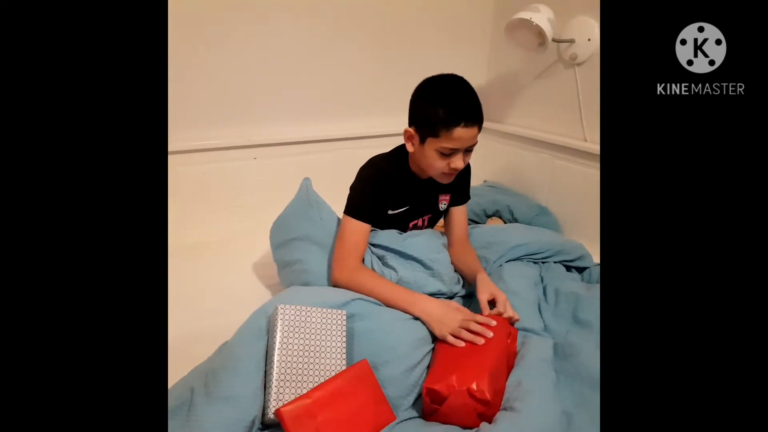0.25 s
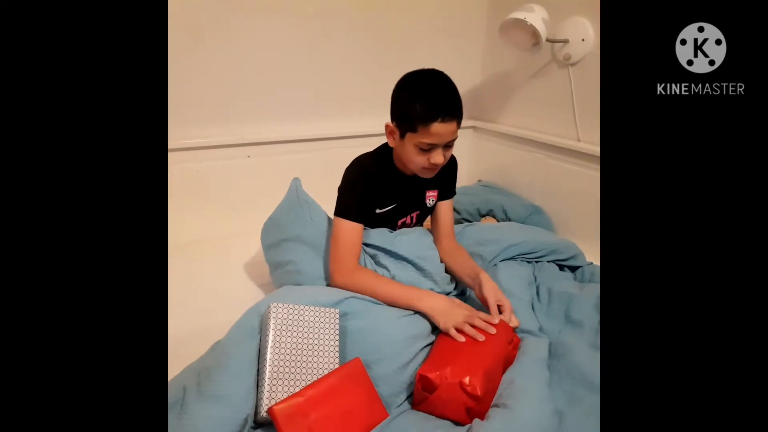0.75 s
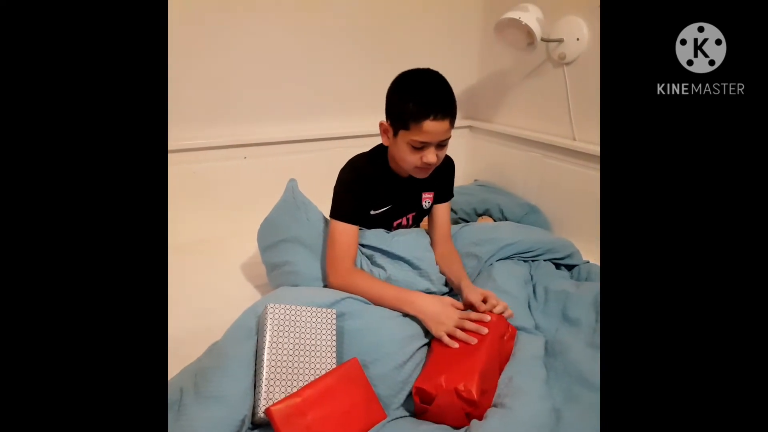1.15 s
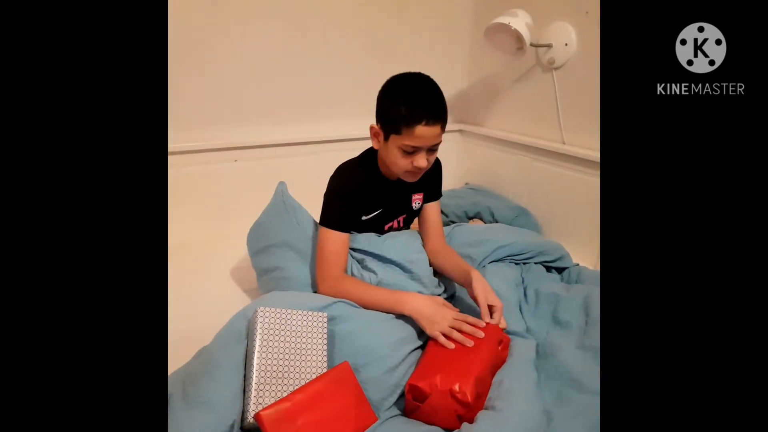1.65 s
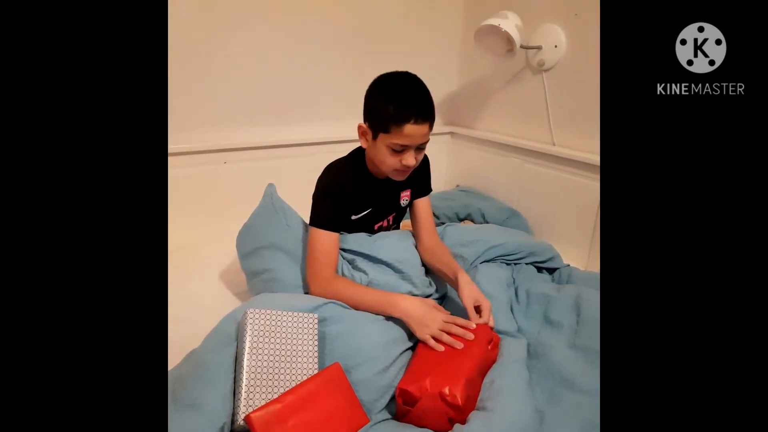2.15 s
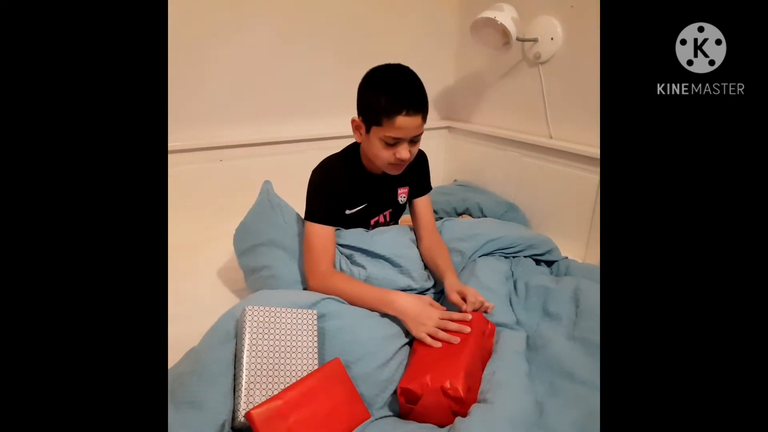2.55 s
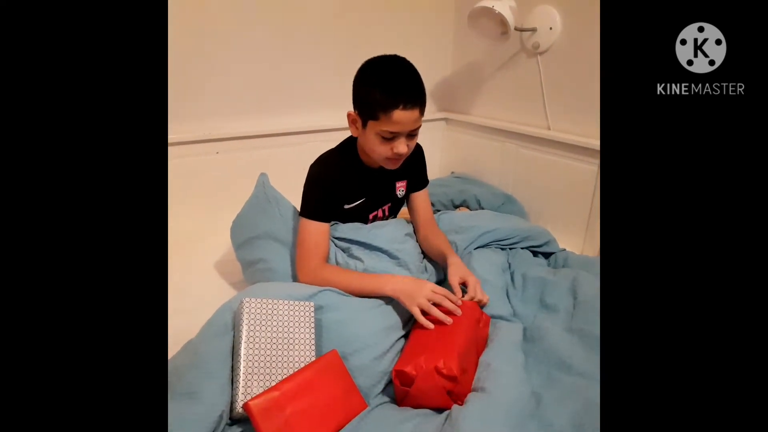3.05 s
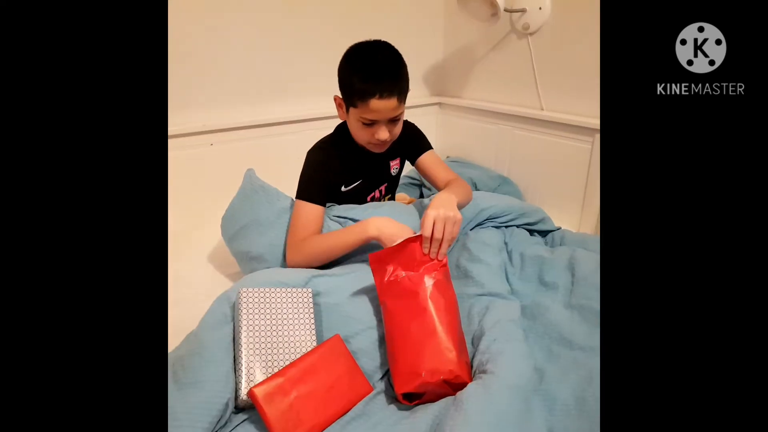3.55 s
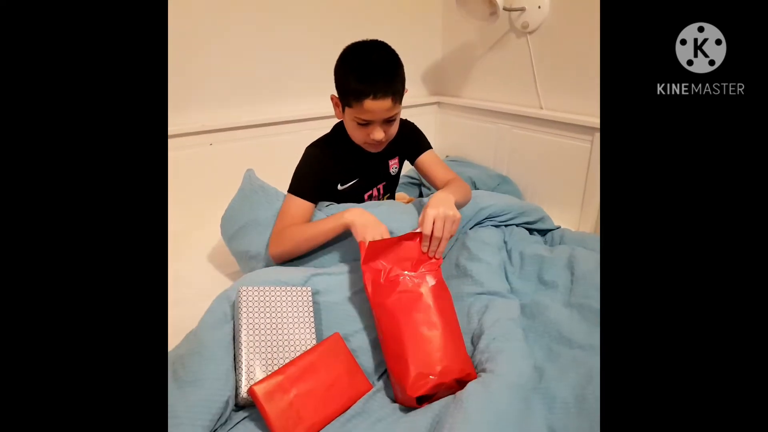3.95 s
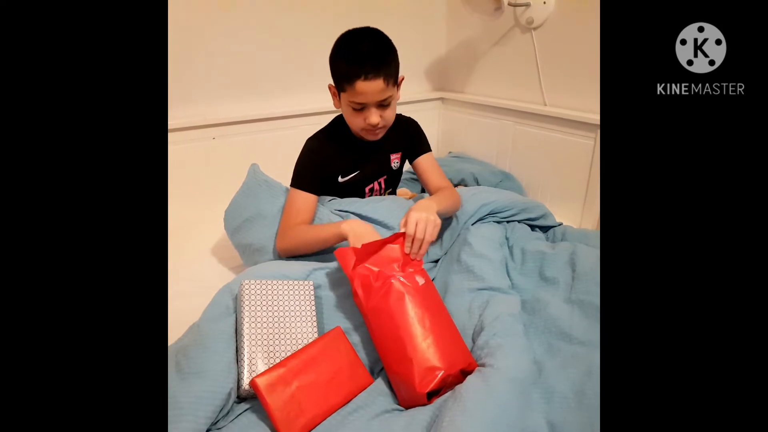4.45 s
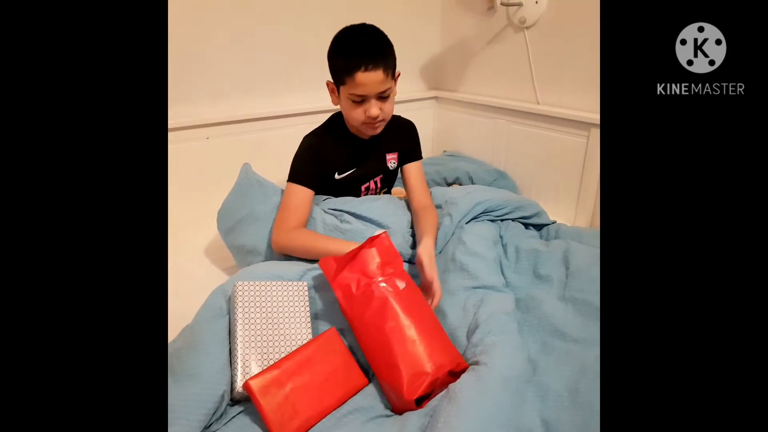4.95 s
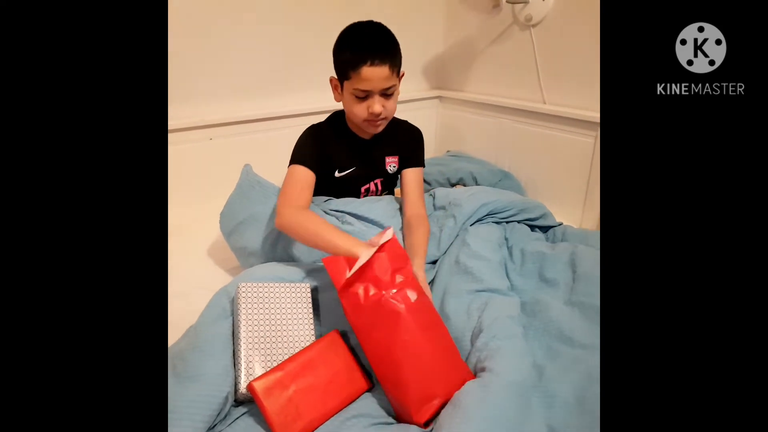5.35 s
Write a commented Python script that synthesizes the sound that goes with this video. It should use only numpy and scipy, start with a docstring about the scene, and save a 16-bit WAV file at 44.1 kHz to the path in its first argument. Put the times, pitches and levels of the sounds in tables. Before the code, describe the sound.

Sharp, uneven paper crackles close up in a quiet bedroom, cutting suddenly to looser crinkling and rummaging inside a big paper-wrapped parcel.

```python
"""Taped wrapping paper snaps and flaps as fingers pick at a present on a bed in a small bedroom; the sound then
switches at once to an opened parcel: a hand digs in it, the sheet rustles, the gift judders in its wrapping.
Snaps are noise bursts coloured by paper facets, rustle is a crowd of tiny ringing buckles over hiss, flaps are
falling chirps, and the judder is a train of slips that rings the hollow parcel. Two ports hear the snaps
directly and as a short wash from the walls, over soft pressing and the noise of a quiet room."""
import sys
import numpy as np
from scipy import signal
from scipy.fft import rfft, irfft
from scipy.io import wavfile
from scipy.ndimage import uniform_filter1d

SR = 44100
rng = np.random.default_rng(int(sys.argv[2]) if len(sys.argv) > 2 else 0)


def dump_mix(stems):
    """Bounce the given channels to the path in sys.argv[1] as a 16-bit WAV at rate SR."""
    frames = np.atleast_2d(stems).T  # one column per channel
    limited = np.clip(frames, -1, 1)  # hard clip at full scale
    pcm = np.round(limited * 32767).astype(np.int16)
    wavfile.write(sys.argv[1], SR, pcm)


N = 247401
TIME = np.arange(N) / SR
OPENED_S = 3.172  # a cut: the sound switches at once from a tightly taped parcel to an opened one

# The loudest creases that buckle: t/s, relative level/dB, tilt/(dB per octave), facet resonance f/Hz,
# left-right/dB, relative room share/dB
CREASE_SNAPS = [(0.0199, -22, 3, 4400, -13, 5.5), (0.0257, -23.5, 3.5, 8950, 6, -1.5),
                (0.052, -23, 1.5, 3770, 6, -0.5), (0.151, -20, 3.5, 2150, -8, -4),
                (0.262, -38, 3, 3200, -3, -5), (0.271, -29.5, 1, 4300, -16, 1),
                (0.2859, -20, 1.5, 1620, -4, -5.5), (0.3268, -32, -1, 1800, -2, 8),
                (0.3357, -11.5, 1, 1980, -2.5, -4), (0.36, -24.5, 1, 2290, -7, 2),
                (0.3692, -14, 3, 2300, 3, -8.5), (0.4228, -10.5, 3.5, 5400, -0.5, -5),
                (0.5959, -21.5, 2.5, 4800, -4, -1.5), (0.6206, -12, 4, 1700, -2, -5.5),
                (0.8187, -19, 4.5, 5500, -1, 3.5), (0.8221, -18, -3, 5660, -1, -5.5),
                (0.8569, -16.5, 3, 1920, 2, -8), (0.911, -24.5, 2, 1300, -1, 3.5),
                (0.986, -36, 1.5, 5000, -6, 10), (0.996, -13, 1.5, 4500, 1, -1.5),
                (1.0741, -11, 3, 10500, -9, -2.5), (1.0815, -11, 5.5, 5500, 8, -4),
                (1.2226, -29.5, -0.5, 6500, -7, 3.5), (1.2917, -29, .5, 2300, -3, 2.5),
                (1.3488, -16, 7.5, 1000, -7, -8), (1.3731, -25.5, 5, 9000, -14, 4),
                (1.3986, -19, 1, 1840, -6, 3.5), (1.4356, -14.5, 1.4, 1000, -1, -2),
                (1.4715, -27, -1, 6600, -11, -5), (1.5152, -24.5, 0.5, 5400, -4, -5.5),
                (1.5556, -30.5, -2.5, 6600, -5, -2), (1.5779, -19.5, 3, 1800, -3, 3),
                (1.5816, -15.5, -2, 4640, -5, -6), (1.6976, -17, 1, 5100, -2, -6.5),
                (1.7198, -14.5, -0.5, 5100, -4, -12.5), (1.8295, -17.5, 3.5, 4000, -6, -2),
                (1.88, -14, -0.1, 1300, -6, 0), (1.8835, -22, 1, 1300, 5, 1),
                (1.9124, -18.5, 1.5, 1400, -4, 0), (1.9346, -19, 3, 5230, 1, 1.5),
                (2.0307, -37.5, 5, 5000, -6, -1), (2.1491, -39.5, -4.5, 1340, -35, -5),
                (2.1914, -17, 3, 1200, -7, -3.5), (2.2733, -21.5, -.5, 2740, -2.5, -4),
                (2.4213, -9, 3.2, 4600, -9, -6), (2.401, -34, 1, 5300, -2, -10),
                (2.4562, -22.5, 1, 4970, 13, 6), (2.6607, -39, -2.5, 3700, -2, -3),
                (2.7741, -36.5, -2, 4570, -2, 9.5), (2.8614, -38, -3, 12100, 5, -3.5),
                (2.9137, -41.5, 1, 5000, 3, -4), (2.977, -17, 1.5, 2370, 4, -4.5),
                (3.025, -20.5, 1.1, 1800, 4, -3.5), (3.177, -30, 1.5, 2880, -41, 6),
                (3.2833, -19, 2, 3880, -6, -3), (3.3506, -22.5, 0, 2450, -15, -1),
                (3.4359, -35, -7, 3500, 1, -6), (3.472, -32.5, -0.5, 2200, -4, 10),
                (3.513, -28, -.5, 13000, -11, 8), (3.743, -20.5, 0, 4030, 3, 1.5),
                (3.7866, -17, -.5, 13000, 2, -3), (3.8012, -18.5, 0, 13000, 0, -10),
                (3.8258, -24, 2, 9000, -2, -9), (3.8685, -24.5, 2.5, 2500, 1, 11.5),
                (3.9784, -17.5, 3.5, 1000, 3, -3), (3.991, -23, 2, 2500, -2, 8),
                (4.056, -24, 1, 2500, -2, -1), (4.0794, -26.5, 0, 7000, 3, 0),
                (4.1145, -22, 0.5, 2300, 3, -5), (4.193, -25.5, 0.9, 1800, 4, 9.5),
                (4.2935, -15, 1, 3120, 3, -1), (4.4155, -12.5, 1, 1500, 4, -3.5),
                (4.5139, -23.5, -0.5, 8660, 4, 0), (4.5681, -18, 0.5, 2400, 7, 4.5),
                (4.579, -12.5, -.5, 12200, 2, -3.5), (4.599, -17, 1, 5300, 1, -2),
                (4.6845, -22, 0.3, 12900, 3, 0.5), (4.7482, -20.5, 1, 1800, 0, -4.5),
                (4.8309, -25, 0.5, 4540, 4.5, -5), (4.8907, -33.5, -2, 2100, -1, 2),
                (4.9207, -29.5, -2.5, 1300, 2, -5), (4.9532, -30.5, -2, 1500, 5, 0),
                (5.175, -21.5, 1.5, 8000, 12, -8), (5.1914, -19, 1.5, 2030, 1, 6.5),
                (5.1962, -11.5, 3.5, 2000, 1, -7), (5.262, -28, 0.5, 1000, 4, 4),
                (5.3447, -23, -0.5, 13000, 3, -4), (5.46, -28.5, -3.5, 1940, 1, -3),
                (5.4743, -21, -1.5, 13400, 7, -5), (5.578, -38, -1.5, 1300, 1, 9)]
# Colour of the tightly taped paper as the two microphone ports hear it:
# f/Hz, left relative level/dB, right relative level/dB
TAPED_AT_PORTS = [(151, -11, -23.5), (400, -16, -13), (940, -5, -4.5), (1500, -6.5, -3.5), (2300, -8, -3.5),
                  (3420, -7.5, -11.5), (4630, -12, -0.5), (5850, -12.5, -2.5), (7000, -15, -6.5),
                  (8560, -8.5, -17), (10230, -8.5, -6), (11100, -7, -6.5), (14900, -14.5, -13),
                  (15700, -10, -15.5)]
# Colour of the open paper as the two microphone ports hear it, the right one dull in the treble:
# f/Hz, left relative level/dB, right relative level/dB
OPEN_AT_PORTS = [(150, -37.5, -17), (400, -8.5, -10), (910, -2, -2), (1500, -5.5, -4.5), (2300, -4.5, -2),
                 (3180, -6.5, -10), (4530, -6.5, -7), (5860, -10.5, -7), (7000, -10, -57), (8000, -7, -53),
                 (9700, -5.5, -13.5), (12200, -6, -25), (14500, -1, -82), (15900, -9.5, -100)]


def amp(db):
    """Level is logarithmic: decibels become an amplitude gain."""
    return 10 ** (np.asarray(db) / 20)


def rms_one(x):
    """Normalization of power: scale to unit rms."""
    return x / np.sqrt(np.mean(x ** 2) + 1e-20)


def panned(db):
    """Constant-power panning: left and right gains for a left-right difference in dB."""
    return rms_one(amp([[db / 2], [-db / 2]]))


def bins(size):
    """Discrete Fourier transform: the frequencies of its bins in Hz."""
    return np.arange(size // 2 + 1) * SR / size


def at_hz(points, hz, axis=1):
    """Constant-ratio frequency scale: read one column of a spectrum along log frequency."""
    points = np.array(points)
    return np.interp(np.log(np.maximum(hz, 1)), np.log(points[:, 0]), points[:, axis])


def causal(db):
    """Minimum phase: folding the cepstrum gives the impulse response in which nothing sounds early."""
    cepstrum = irfft(np.log(amp(db)))
    half = cepstrum.shape[-1] // 2
    cepstrum[..., 1:half] *= 2
    cepstrum[..., half + 1:] = 0
    return irfft(np.exp(rfft(cepstrum)))


def through(x, response):
    """Linear superposition: convolve each channel with an impulse response."""
    convolved = signal.fftconvolve(np.atleast_2d(x), np.atleast_2d(response), axes=-1)
    return convolved[:, :x.shape[-1]]


def resonate(x, modes):
    """Modal synthesis: parallel damped resonators of f/Hz, width/Hz, gain/dB."""
    out = 0
    for hz, width, db in modes:
        r = np.exp(-np.pi * width / SR)
        zeros = np.array([1, 0, -1]) * (1 - r * r) / 2
        poles = [1, -2 * r * np.cos(2 * np.pi * hz / SR), r * r]
        out = out + amp(db) * signal.lfilter(zeros, poles, x)
    return out


def add(out, s, sound):
    """Superposition of events: mix a short sound in at time s."""
    at = max(round(s * SR), 0)
    out[:, at:at + sound.shape[-1]] += sound[:, :max(N - at, 0)]


def heard_paper_db(table, hz):
    """Inefficient bass radiation of a sheet: its colour as the two ports hear it, falling away in the bass."""
    colour = np.array([at_hz(table, hz, axis=1), at_hz(table, hz, axis=2)])
    return colour - 10 * np.log10(1 + (130 / (hz + 1)) ** 4)


def tilted_paper_db(s, tilt, hz):
    """Spectral tilt: the paper as heard at time s, sloped in dB per octave above 600 Hz."""
    paper = TAPED_AT_PORTS if s < OPENED_S else OPEN_AT_PORTS
    return heard_paper_db(paper, hz) + tilt * np.log2(np.maximum(hz, 600))


def shaped(excitation, colour_db, pan):
    """Source-filter principle: colour and pan a short excitation, with the energy of 1 ms at unit level."""
    sound = through(excitation, causal(colour_db)) * panned(pan)
    energy = np.sum(sound ** 2) / 2
    return sound / np.sqrt(energy / (SR / 1000))


def snaps(flutter_db, flutter_s, ring_octaves, room_ring, room_pan, size=512):
    """Buckling instability: a crease gives way within a millisecond and the facets round it flutter briefly."""
    crack_s, first_kick = 0.00078, 2.24  # decay time of the crack; weight of the fold's first sample
    facet_db = 6.5  # height of the facet resonance
    below_db, below_octaves = -2.5, 1.6  # a facet radiates little this far below its resonance
    direct, to_room = np.zeros((2, 2, N))
    t, hz = TIME[:size], bins(size)
    impulse = 1.0 * (t == 0)
    octave = np.log2(np.maximum(hz, 600))
    envelope = np.exp(-t / crack_s) + amp(flutter_db) * np.exp(-t / flutter_s)
    for s, db, tilt, ring_hz, pan, room_db in CREASE_SNAPS:
        colour = tilted_paper_db(s, tilt, hz)
        above = octave - np.log2(ring_hz)
        peak = facet_db * np.exp(-(above / ring_octaves) ** 2)
        dip = below_db * np.exp(-((above + below_octaves) / ring_octaves) ** 2)
        ring = peak + dip
        burst = rng.standard_normal((2, size)) * envelope
        burst[:, 0] += first_kick * rng.choice([-1, 1])
        burst /= np.linalg.norm(burst, axis=1, keepdims=True)
        add(direct, s, amp(db) * shaped(burst, colour + ring, pan))
        # the walls gather what the sheet sends in all directions: smoother in colour, less to one side
        sent = shaped(impulse, colour + room_ring * ring, room_pan * pan)
        add(to_room, s, amp(db + room_db) * sent)
    return direct, to_room


def after_ticks(wait_s, below_db, count=6, size=4096):
    """Stress redistribution: a snap loads the creases next to it, and smaller ticks follow at random waits."""
    out, hz = np.zeros((2, N)), bins(256)
    tick_decay = np.exp(-1 / (.0002 * SR))  # a decay time of 0.2 ms
    for s, db, tilt, *_ in CREASE_SNAPS:
        waits = np.minimum(rng.exponential(wait_s, count), TIME[size - 200])
        sizes = amp(rng.normal(0, 4, (2, count))) * np.exp(-.7 * waits / wait_s)
        ticks = np.zeros((2, size))
        ticks[:, (waits * SR).astype(int)] = sizes
        envelope = signal.lfilter([1], [1, -tick_decay], ticks + 1e-18)
        cracks = envelope * rng.standard_normal((2, size))
        add(out, s + .004, amp(db + below_db) * shaped(cracks, tilted_paper_db(s, tilt, hz), 0))
    return out


def flaps(spread_s, rough, size=8192):
    """Bending-wave dispersion: high pitch runs faster, so a flexing panel arrives as a falling chirp."""
    # Whole panels that flex: t/s, level/dB, starting f/Hz, decay time/s, left-right/dB
    flexes = [(0.729, -33, 410, 0.014, -34), (1.735, -41, 261, 0.013, -3), (2.2, -38, 380, 0.028, -27),
              (2.419, -35, 600, 0.016, -7), (2.4543, -18.5, 283, 0.011, -43), (4.438, -45, 292, 0.025, -9),
              (5.196, -39, 132, 0.05, -16)]
    out, t = np.zeros((2, N)), TIME[:size]
    for s, db, hz, decay, pan in flexes:
        phase = 2 * np.pi * hz * spread_s * np.log1p(t / spread_s)
        wobble = 1 + rough * rms_one(uniform_filter1d(rng.standard_normal(size), size=50))
        add(out, s, amp(db) * panned(pan) * np.sin(phase) * wobble * np.exp(-t / decay))
    return out


def pop():
    """Snap-through: a taut panel turns inside out and gives one hard, dull pulse."""
    # The pop: t/s, kick level/dB, left-right/dB
    pop_event = (2.1987, 6.0, -42)
    # Resonances of the panel: f/Hz, width/Hz, gain/dB
    panel_modes = [(1300, 1200, 9.5), (4300, 1700, 0.5)]
    s, db, pan = pop_event
    kick = np.zeros(N)
    kick[round(s * SR)] = amp(db)
    dull = signal.butter(4, 6500, fs=SR, output="sos")
    return signal.sosfilt(dull, resonate(kick, panel_modes)) * panned(pan)


def clumps():
    """Clustered failure: tiny creases give way in clumps, so their level wanders at random."""
    spread_db, clump_s = 3.5, .007  # standard deviation at each knot; spacing of the knots
    knots = np.arange(0, TIME[-1] + clump_s, clump_s)
    return amp(spread_db * np.interp(TIME, knots, rng.standard_normal(len(knots))))


def grains(per_s, spread_db, hiss_db, low_hz, high_hz, count=12):
    """Crackling noise: tiny buckles of very uneven size each ring a facet, over the hiss of friction."""
    born = rng.random(N) < per_s / SR
    sizes = amp(spread_db * np.minimum(rng.exponential(1, N), 3.5))
    clicks = born * sizes * clumps() * rng.choice([-1, 1], N)
    facet, out = rng.integers(0, count, N), 0
    for k, hz in enumerate(np.geomspace(low_hz, high_hz, count)):
        ringing = resonate(clicks * (facet == k) + 1e-18, [(hz, hz / 3.5, 0)])
        # a shift of a few samples: the ports hear low facets alike and high ones out of step
        other_port = np.roll(ringing, rng.integers(-9, 10))
        out = out + np.array([ringing, other_port])
    hiss = amp(hiss_db) * rng.standard_normal((2, N))
    return rms_one(rms_one(out) + hiss)


def rustle(excitation, kind, split_hz, size=1024):
    """Source-filter principle: the lower or the upper part of the grains takes the colour of paper as heard."""
    split = signal.butter(3, split_hz, kind, fs=SR, output="sos")
    part = signal.sosfilt(split, excitation)
    taped = rms_one(through(part, causal(heard_paper_db(TAPED_AT_PORTS, bins(size)))))
    opened = rms_one(through(part, causal(heard_paper_db(OPEN_AT_PORTS, bins(size)))))
    return np.where(TIME < OPENED_S, taped, opened)


def tug(s, hold):
    """Attack-hold-release envelope: the grip tightens quickly to full at s, holds and lets go."""
    attack_s, release_db_per_s = 0.018, 260
    attack = np.clip((TIME - s) / attack_s + 1, 0, 1)
    return attack * amp(-release_db_per_s * np.maximum(TIME - s - hold, 0))


def handling():
    """Power addition of independent efforts: gains of sliding, pressing and crinkling under the hands."""
    # The fingers tug at the paper: t of full grip/s, hold/s, relative effort/dB,
    # relative weight on the parcel/dB, crispness relative to effort/dB
    finger_tugs = [(0.0, 0.028, -39, -1, 4.5), (0.12, 1.5, -64.5, 4, 12), (0.287, 0.2, -45.5, 1.5, 4),
                   (0.599, 0.09, -49, 1.5, -9), (0.814, 0.091, -39, -2.5, -2), (1.072, 0.1, -40.5, -2, 5.5),
                   (1.36, 0.11, -47.5, 5.5, 12.5), (1.57, 0.028, -40, -4.5, -14),
                   (1.721, 0.022, -39.5, -1, 6), (1.89, 0.02, -56, 17.5, 0), (2.194, 0.15, -43, -3.5, -1.5),
                   (2.374, 0.15, -40, -2.5, -5.5), (2.773, 0.15, -59, 6, 3),
                   (2.976, 0.074, -43.5, -3.5, -14), (3.186, 0.019, -37.5, -2, 3.5),
                   (3.499, 0.045, -35, -5.5, 0.5), (3.782, 0.033, -46, -5, 12),
                   (4.218, 0.075, -36.5, -1.5, 1.5), (4.394, 0.02, -32, -6, -1), (4.569, 0.022, -44, 6, 14),
                   (4.944, 0.055, -43, 3, 4.5), (5.06, 0.026, -38, -21, -17), (5.158, .05, -40, 1.5, 3)]
    # A hand rummages in the opened parcel: t/s, relative effort/dB, relative level of the fine crinkle/dB
    hand_efforts = [(3.2, -66, -62), (3.29, -63, -66), (3.39, -43, -70), (3.54, -52.5, -58),
                    (3.82, -45, -37), (3.93, -43.5, -42.5), (4.15, -44.5, -41.5), (4.27, -45, -50),
                    (4.45, -46.5, -42), (4.78, -47.5, -51), (4.95, -57, -47), (5.13, -47, -45.5),
                    (5.33, -48, -48.5), (5.61, -54.5, -47.5)]
    resting_db = [[-65.5], [-79.5], [-58]]  # the wrapping never lies quite still: slide, press, crinkle
    tug_press_db = -8.5  # pressing relative to the effort of a tug, before its weight
    s, *columns = np.transpose(hand_efforts)
    effort_db, fine_db = (np.interp(TIME, s, column) for column in columns)
    rummage = amp([effort_db + 1.5, effort_db - 7.5, fine_db + 3])  # slide, press, crinkle
    rummage = rummage * (TIME > OPENED_S)
    power = amp(resting_db) ** 2 + rummage ** 2
    for s, hold, db, weight_db, crisp_db in finger_tugs:
        gains = amp([[db], [db + tug_press_db + weight_db], [db + crisp_db]])
        power = power + (gains * tug(s, hold)) ** 2
    return np.sqrt(power)


def judder(jitter, drive_db, scrape_db):
    """Stick-slip friction: uneven slips, each with a little scrape, ring the hollow parcel."""
    # The gift sticks and slips in its wrapping: t/s, nominal slip rate/(1/s), relative level/dB
    slip_path = [(5.044, 150, -6.5), (5.066, 150, -6.5), (5.103, 167, -9.5), (5.113, 150, -27),
                 (5.135, 110, -24)]
    # Resonances of the hollow parcel: f/Hz, width/Hz, gain/dB
    parcel_modes = [(435, 77, -1), (533, 51, 10.5), (648, 53, 7), (990, 97, -6), (1800, 270, -13),
                    (2480, 220, -35)]
    times, per_s, db = np.transpose(slip_path)
    slips, s = np.zeros(N), times[0]
    for early_or_late in rng.uniform(-1.1, 1, 40):
        if s < times[-1]:
            slips[round(s * SR)] = amp(np.interp(s, times, db) + drive_db)
        s += np.exp(jitter * early_or_late) / np.interp(s, times, per_s)
    scrape = through(slips, np.exp(-TIME[:1024] / 0.0041)) * rng.standard_normal((2, N))
    ringing = resonate(slips + amp(scrape_db) * scrape, parcel_modes)
    muffle = signal.butter(4, 3200, fs=SR, output="sos")  # the wrapping muffles the top
    return signal.sosfilt(muffle, ringing)


def bumps(size=32768):
    """Damped forced vibration: a hand lands on or brushes a panel, which answers with dying band noise."""
    # Hands on a panel: t/s, level/dB, f/Hz, width of the first resonance/Hz, decay time/s, left-right/dB
    hand_contacts = [(0.02, -42, 320, 250, .028, 0), (0.52, -50, 200, 120, 0.0088, -4),
                     (0.727, -34, 674, 400, 0.0021, -25), (1.185, -43, 130, 120, 0.0068, -17),
                     (1.882, -30, 1340, 400, 0.012, 7), (2.42, -32, 550, 450, 0.0071, -1),
                     (2.455, -31, 504, 600, 0.0049, -10), (3.175, -47.5, 2480, 160, .16, -6),
                     (3.176, -43, 3600, 500, 0.036, -3), (3.195, -45.5, 300, 110, 0.067, 1.5),
                     (3.206, -42, 161, 40, 0.038, 1), (3.393, -35, 1300, 400, 0.0068, -5),
                     (3.514, -37.5, 200, 130, 0.015, 1), (3.516, -36, 1280, 350, 0.018, 7),
                     (3.53, -55, 2430, 200, 0.15, -10), (3.976, -40, 1110, 400, 0.034, 0),
                     (4.252, -40.5, 600, 400, 0.055, -1), (4.43, -37, 264, 121, .029, 0),
                     (4.992, -35.5, 294, 159, 0.015, 1), (5.05, -31, 480, 255, 0.055, 2),
                     (5.071, -50, 2170, 1300, .029, 8), (5.16, -37, 400, 248, 0.038, 2),
                     (5.476, -44.5, 640, 450, 0.016, -7)]
    out = np.zeros((2, N))
    for s, db, hz, width, decay, pan in hand_contacts:
        narrow = resonate(rng.standard_normal(size), [(hz, width, 0)])
        body = resonate(narrow, [(hz, 2 * width, 0)])
        body = body / np.sqrt(uniform_filter1d(body ** 2, size=700) + 1e-20)  # even out the level
        add(out, s, amp(db) * panned(pan) * body * np.exp(-TIME[:size] / decay))
    return out


def soft_noise(colour, side_db, size=4096):
    """Interchannel coherence: coloured noise from a shared middle and a weaker, opposed side."""
    mid, side = rng.standard_normal((2, N))
    hz = bins(size)
    db = np.array([at_hz(colour, hz, axis=1), at_hz(colour, hz, axis=2)])
    ports = mid + amp(side_db) * side * [[1], [-1]]
    return rms_one(through(ports, causal(db)))


def pressed():
    """Stiffness control: hands lean on the parcel, which while taped tight is too stiff to give much bass."""
    # Soft pressing: f/Hz, left relative level/dB, right relative level/dB
    press_spectrum = [(24.4, -35, -29), (49, -10, 12), (110, -1, 1), (200, 3, 6), (350, 4.5, 5.5),
                      (600, -5, 1), (1200, -29.5, -22.5)]
    soft = soft_noise(press_spectrum, side_db=-36)
    bass_cut = signal.butter(1, 110, "high", fs=SR, output="sos")
    stiff = signal.sosfilt(bass_cut, soft)
    return np.where(TIME < OPENED_S, stiff, soft)


def room(x, early_db, early_s, size=22050):
    """Reverberant decay: close reflections from bed and corner, then a diffuse tail with its bass shared."""
    # Reverberation time of the diffuse tail: f/Hz, T60/s
    decay_times = [(150, 0.11), (600, 0.19), (2000, 0.23), (5000, 0.23), (10000, 0.19), (15000, 0.22)]
    t, hz = TIME[:size], bins(size)
    separate = rfft(rng.standard_normal((2, size)))
    shared = rfft(rng.standard_normal(size))
    alike = 1 / (1 + (hz / 1300) ** 2)  # the bass is alike in both ports
    spectrum = np.sqrt(1 - alike) * separate + np.sqrt(alike) * shared
    tail = 0
    for centre, t60 in decay_times:
        band = at_hz([(f, float(f == centre)) for f, _ in decay_times], hz)
        tail = tail + irfft(spectrum * band, size) * amp(-60 * t / t60)
    early = 1 + amp(early_db) * np.exp(-t / early_s)
    onset = np.clip((t - .002) / 0.0015, 0, 1)  # the first reflections arrive after 2 ms
    return through(x, rms_one(tail * early * onset) / np.sqrt(size))


def quiet_room():
    """Stationary background noise: steady coloured noise of the quiet room, partly shared by the ports."""
    # The quiet room: f/Hz, left relative level/dB, right relative level/dB
    quiet_spectrum = [(25, -24, -6), (57.4, 17, 30.5), (200, 5, 11.5), (1000, -17, -19), (4000, -5, -39),
                      (15000, 7, -42)]
    return amp(-62) * soft_noise(quiet_spectrum, side_db=-9)


def scene():
    """Superposition: paper, parcel and hands in the bedroom, with handling effort driving the rustle."""
    sliding, pressing, crinkling = handling()
    direct, to_room = snaps(flutter_db=-7.5, flutter_s=0.0023, ring_octaves=0.36, room_ring=0.44, room_pan=0.5)
    ticks = after_ticks(wait_s=.02, below_db=-13)
    broad_facets = grains(per_s=600, spread_db=5, hiss_db=-2.5, low_hz=450, high_hz=4000)
    fine_facets = grains(per_s=1000, spread_db=4, hiss_db=1, low_hz=3500, high_hz=14400)
    slide = amp(-6.0) * sliding * rustle(broad_facets, "low", split_hz=3900)
    crinkle = amp(-10.0) * crinkling * rustle(fine_facets, "high", split_hz=1860)
    sheet = slide + crinkle
    popped = pop()
    flapping = flaps(spread_s=0.00538, rough=0.36)
    parcel = judder(jitter=0.46, drive_db=3.0, scrape_db=-12) * panned(-2.4) + bumps()
    press = amp(1.0) * pressing * pressed()
    sent = amp(-1.0) * to_room + sheet + amp(-4) * parcel + amp(-14.5) * popped.mean(0)
    wash = room(sent, early_db=13.5, early_s=0.0016)
    paper = amp(-1.94) * direct + ticks + sheet + popped + flapping
    return paper + parcel + press + wash + quiet_room()


def record(dry):
    """Clipping and band limitation: full scale bounds the peaks and the treble above 15.8 kHz is cut."""
    top_cut = signal.ellip(10, .2, 80, 15800, fs=SR, output="sos")
    return signal.sosfilt(top_cut, np.clip(dry, -1, 1))


dry = scene()
out = record(dry)
dump_mix(out)
```